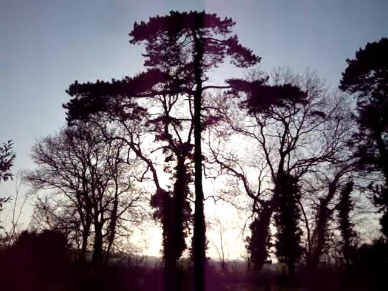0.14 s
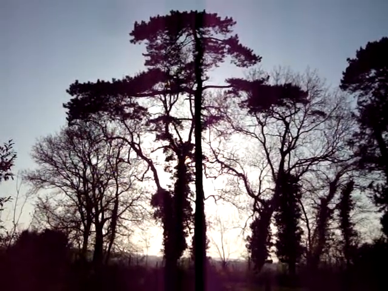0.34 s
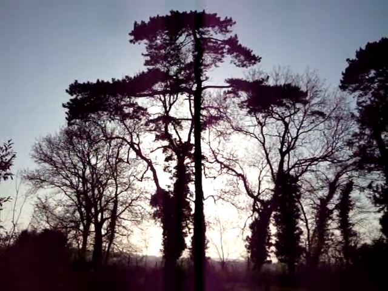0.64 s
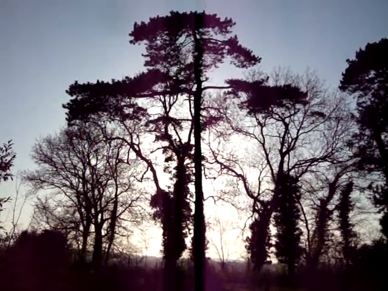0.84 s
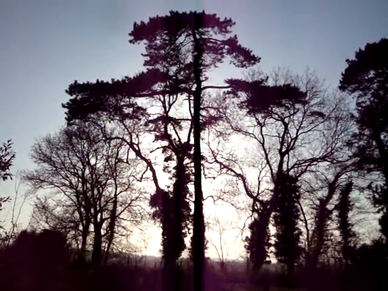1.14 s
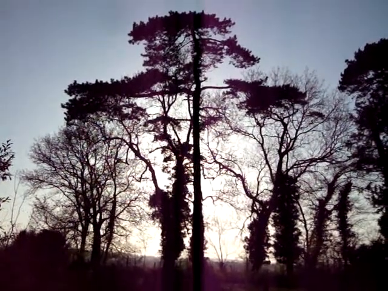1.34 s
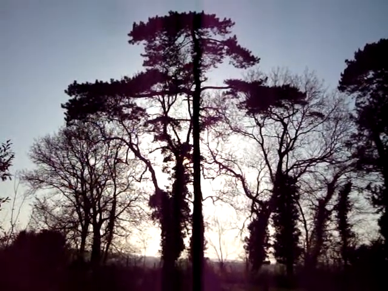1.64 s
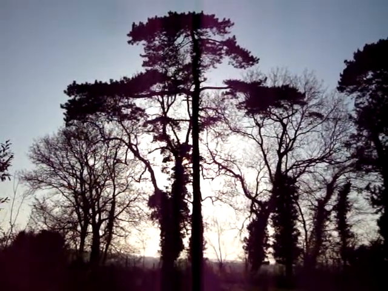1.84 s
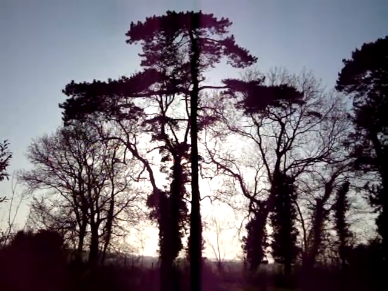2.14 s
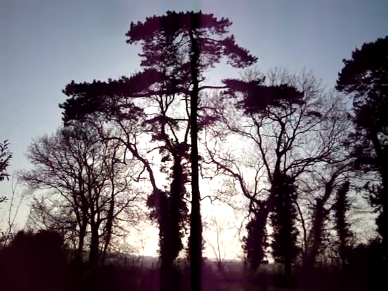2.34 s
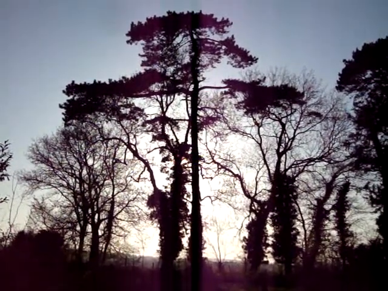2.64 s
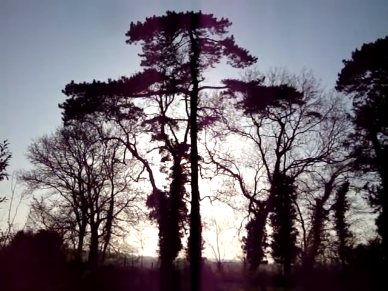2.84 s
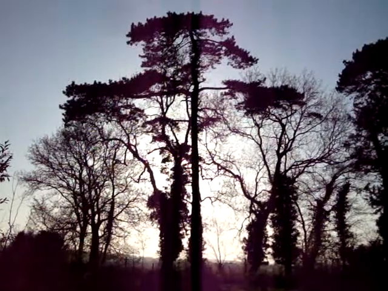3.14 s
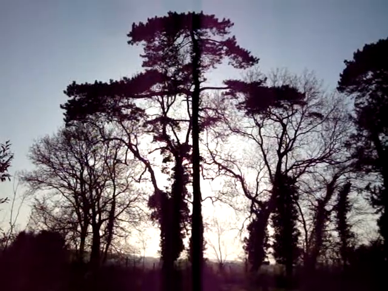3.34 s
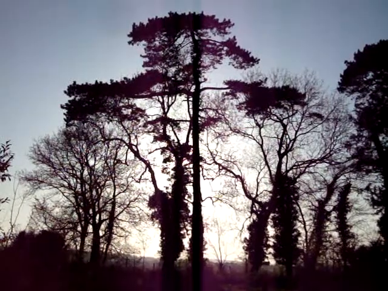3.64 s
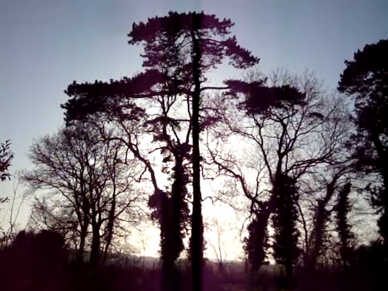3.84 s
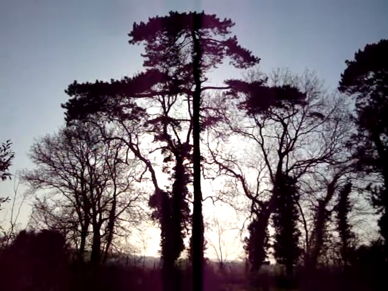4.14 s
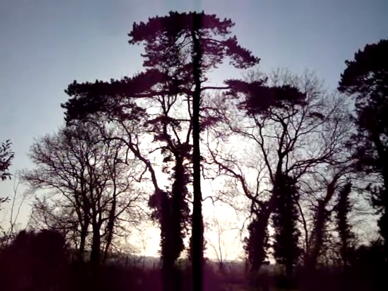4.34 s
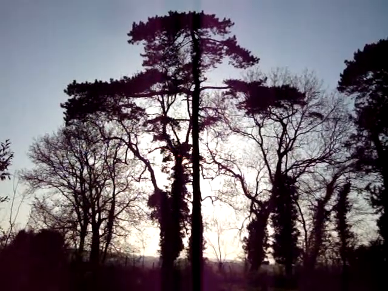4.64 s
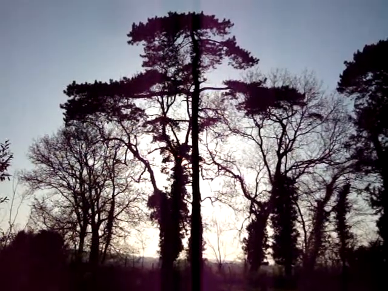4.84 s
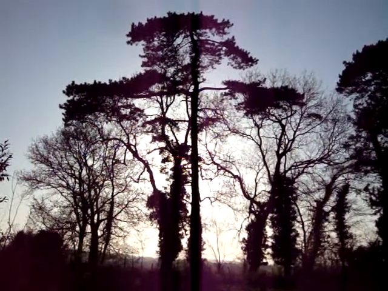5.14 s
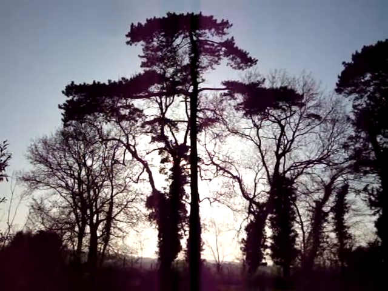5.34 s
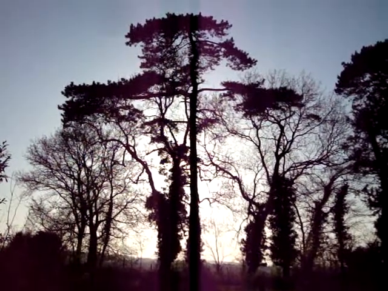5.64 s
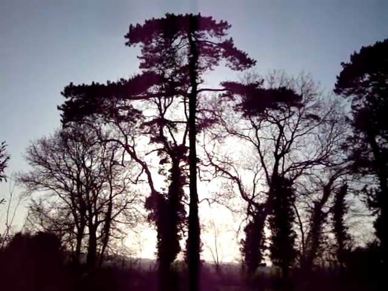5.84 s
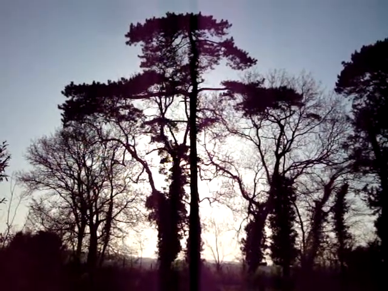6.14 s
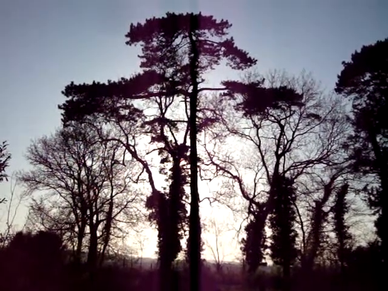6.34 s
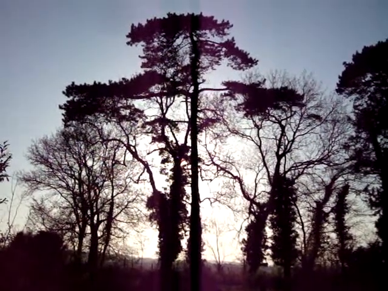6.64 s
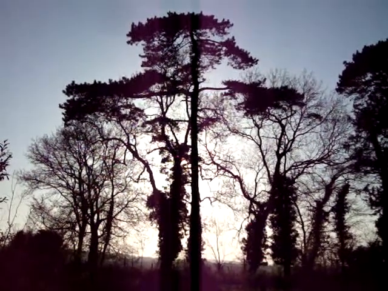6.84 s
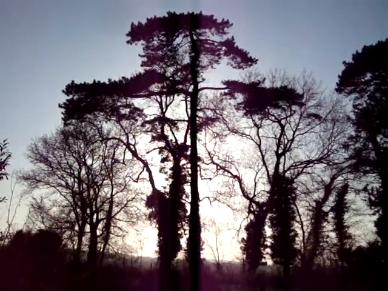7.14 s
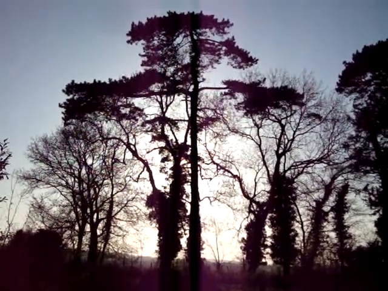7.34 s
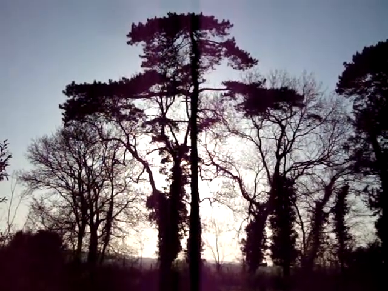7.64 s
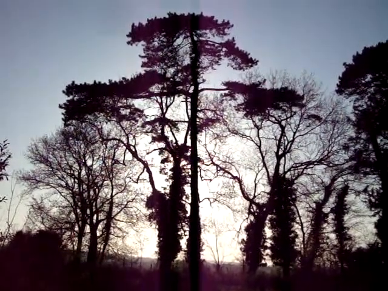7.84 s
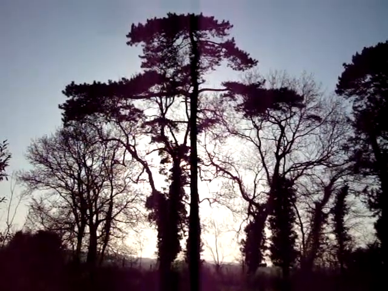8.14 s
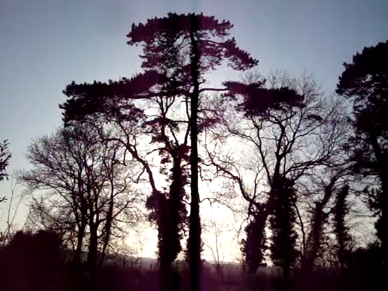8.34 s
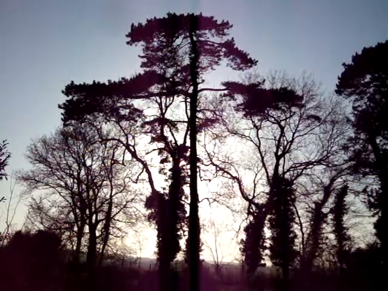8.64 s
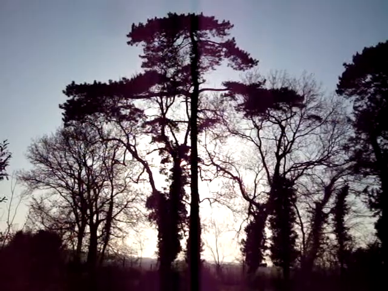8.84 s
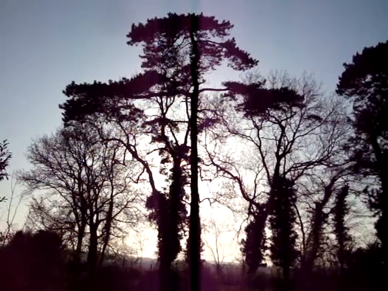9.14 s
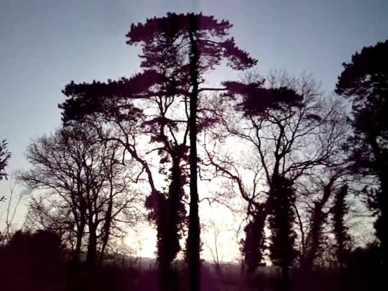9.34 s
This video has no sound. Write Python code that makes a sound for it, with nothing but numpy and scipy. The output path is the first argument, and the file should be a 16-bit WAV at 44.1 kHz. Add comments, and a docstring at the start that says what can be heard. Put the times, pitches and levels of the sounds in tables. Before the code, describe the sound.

Over a steady wash of far traffic and the hiss of a small microphone, a group of crows caws in a stand of trees. The chorus soon thins to occasional caws, leaving the clipped chacks and clear notes of jackdaws and faint pipes of small birds, all slightly echoing. A brief high scolding and a faint tick pass, then one sharp knock hits the microphone's housing before the last few calls.

```python
"""Crows roost in tall trees at dusk. From the start, far traffic roars and a small microphone hisses.
For three seconds hoarse caws overlap, each a buzz shaped by throat and beak; later they come singly.
Jackdaws soon add falling chacks, then clear cries among small birds' pipes; trees scatter every call.
Near 4 s a small bird scolds, at 5.4 s comes a dry tick, and at 7.8 s something knocks on the
microphone's housing. One faint caw and a few last chacks and clear notes end the scene."""
import sys
import numpy as np
from scipy import signal
from scipy.fft import rfft, irfft
from scipy.io import wavfile

SR = 44100
rng = np.random.default_rng(int(sys.argv[2]) if len(sys.argv) > 2 else 0)


def to_wav(s):
    """Save 16-bit WAV."""
    ch = np.atleast_2d(s).T  # columns
    pcm = np.round(np.clip(ch, -1, 1) * 32767)  # PCM
    wavfile.write(sys.argv[1], SR, pcm.astype(np.int16))


N = 418068
CUTOFF_HZ = 10150   # treble above this is cut away

# One caw a row: start/s, length/s, start pitch/Hz, end pitch/Hz, bend (higher = later), level/dB,
# swell from start to end/dB, roughness (0-1), throat tone/Hz, throat width/Hz, beak tone/Hz,
# beak level/dB, shrill tone/Hz, shrill level/dB, fade-in/s, trill depth (share of the pitch)
CROW_CALLS = [(-.16,.41,872,721.6,1.1,-45.5,-2.5,0.37,1690,500,2460,-17,5350,-21,0.011,0.072),
              (-.05,.17,480,412,1.16,-49.5,-11,0.46,950,250,2600,-7,5300,-28,0.012,0.0062),
              (.215,0.13,701,682,1.54,-44,2,0.54,1410,400,2570,-18,5300,-25,0.036,0.043),
              (.27,0.41,291,298.3,2.83,-49,-5.5,0.66,1600,399,2700,-2.5,5300,-18.5,0.082,0.0035),
              (.517,0.15,305.7,337.6,2.57,-45,-1,0.82,1360,344,2440,-13,5200,-25,.015,0.0041),
              (.64,0.38,323.5,285,4,-44,-4,0.27,1390,334,3070,-16.5,5400,-27,0.11,0),
              (.775,0.29,537,388,5.5,-49.5,-2,0.2,1050,340,3240,-25,5270,-32,.05,0.0049),
              (.90,0.33,322.8,261.2,1.23,-48.5,-5,0.58,1580,302,2430,-25,5300,-19.5,0.024,0.0071),
              (1.225,0.23,361.2,330,1.46,-45,-11,0.32,1110,806,2620,-13.5,5930,-21.5,0.035,0.032),
              (1.33,0.30,361.6,335.8,2.2,-47.5,2,0.59,1570,500,2820,-7.5,6000,-25,0.13,0),
              (1.605,0.22,325.2,305,2.46,-47,1,.42,1580,380,2630,-13.5,5340,-23,0.02,0),
              (1.795,.15,332.3,287,1.93,-46.5,-3,.4,1620,397,2820,-16.5,5340,-21,.03,0),
              (1.921,0.26,311,224,2.1,-54,4,0.54,1500,340,2670,-17,5240,-20.5,0.021,0.0063),
              (2.15,0.32,353.6,328.5,2.27,-49,-0.5,0.69,1330,795,2710,-8,5300,-27,0.032,0.021),
              (2.31,0.16,336,323.4,1.94,-46.5,-16,.6,1390,300,2520,-12,5360,-28,.04,.03),
              (2.369,0.15,544,506,1.6,-51,1,0.44,1590,300,2600,-14,5300,-19,.04,0.017),
              (2.488,0.14,308,323,1.5,-49,-9,0.44,1250,250,2550,-13,5300,-30,.02,0.019),
              (2.701,0.37,326,287.6,0.72,-52,-6,0.92,1400,404,2640,-22.5,5330,-34,0.022,0.0062),
              (4.791,0.16,366.4,369,2.1,-59.5,1,0.5,1730,344,2660,-11,5300,-23,.02,0.0032),
              (5.472,0.41,348.6,322.5,1.94,-54,-1,0.75,1460,340,2600,-35,5300,-31,.03,0),
              (6.666,0.36,345.4,315,2.4,-55.5,-6,0.87,1250,344,2600,-30,5300,-34,0.023,0.011),
              (8.421,0.34,357,346,2.8,-65.5,0,0.44,1720,340,2600,-31,5300,-27,.03,0)]
def caws():
    """A crow's voice box buzzes; chest, throat and beak boost some overtones; hoarseness shakes them."""
    out = np.zeros(N)
    k = np.arange(1, 22)[:, None]   # the partials: tones at 1, 2, 3... times the pitch
    scoop_s, fade_out_s, trill_hz, arch_db = 0.025, 0.015, 66.1, 1.5
    for (start, length, start_hz, end_hz, bend, db, swell_db, rough, throat_hz, throat_width_hz,
         beak_hz, beak_db, shrill_hz, shrill_db, fade_in_s, trill) in CROW_CALLS:
        n = int(length * SR)
        u = np.arange(n) / n   # runs from 0 to 1 over the call
        t = u * length
        scoop = 1 - 0.09 * np.exp(-t / scoop_s)   # each caw slides up into its note
        tune = glide(u, start_hz, end_hz, bend) * scoop
        pitch = tune * (1 + .01 * wobble(n, 12))   # the voice wavers
        pitch *= 1 + trill * np.sin(2 * np.pi * trill_hz * t)   # some throats rattle evenly
        shake = (.004 + .024 * rough ** 2) * wobble(n, 60)
        phase = 2 * np.pi * np.cumsum(pitch * (1 + shake)) / SR
        hz = k * pitch
        chest = from_db(-15) * resonance(hz, centre_hz=960, width_hz=250)
        throat = resonance(hz, throat_hz * (tune / start_hz) ** 0.6, throat_width_hz)   # follows the tune
        beak = from_db(beak_db) * resonance(hz, beak_hz, width_hz=560)
        shrill = from_db(shrill_db) * resonance(hz, shrill_hz, width_hz=1200)
        gain = chest + throat + beak + shrill
        gain *= (hz < CUTOFF_HZ) / (1 + (800 / hz) ** 6)   # a small body gives off little bass
        gain /= np.sqrt(np.sum(gain ** 2, axis=0) / 2)   # keep the total power steady
        noisy = np.clip((rough * hz / 1400) ** 2, 0, 1)   # high partials break up first
        gain *= np.sqrt(1 - noisy) + np.sqrt(noisy) * wobble(n, 160, count=len(k))
        voice = np.sum(gain * np.cos(k * phase + .3 * k ** 2), axis=0)
        voice *= 1 + .6 * rough * np.cos(phase / 2)   # strong and weak pulses take turns
        fades = np.clip(np.minimum(t / fade_in_s, (length - t) / fade_out_s), 0, 1)
        effort = from_db(db + swell_db * (u - .5) + arch_db * (np.sin(np.pi * u) - 1.5))
        add(out, start, voice * fades * effort)
    return out


# One chack a row: start/s, length/s, start pitch/Hz, end pitch/Hz, drop point (share of the length),
# level/dB, lowest partial's boost/dB, shrill tone/Hz, shrill boost/dB
JACKDAW_CALLS = [(0.358,0.042,1435,1160,0.46,-50.5,4,4800,-16),
                 (0.733,0.067,1442,930,0.51,-44,-2.5,4700,-10), (.945,0.054,1650,1000,.5,-61,-14,3500,-8),
                 (0.995,0.055,1313,1130,0.43,-55,10,4800,-18), (2.253,0.076,1258,1070,0.25,-54,2,4800,-8),
                 (2.654,0.055,1300,980,0.32,-51,1.5,4800,-18),
                 (2.954,0.048,1413,1300,0.55,-58,-10,4900,-16),
                 (3.392,0.041,1267,1030,0.44,-58,-13,4800,-12), (4.065,0.057,1283,970,0.51,-59,-8,4800,-9),
                 (4.979,0.072,1333,1170,0.34,-60,5.5,4800,-19),
                 (5.345,0.047,1335,1160,0.59,-58.5,-6,4800,-6),
                 (5.402,0.055,1360,720,0.45,-52.5,8.5,4500,-6.5),
                 (5.763,0.077,1435,830,0.32,-51.5,-5,5000,-19), (5.861,0.064,1337,1010,0.39,-53,4,4800,-28),
                 (6.17,0.08,1304,780,0.4,-54,-11,4760,-11), (6.182,0.044,1435,1280,0.48,-54.5,7.5,4800,-16),
                 (6.611,0.056,1420,880,0.55,-46.5,-3,4640,-10), (7.032,.068,1292,690,.4,-52,4,4640,-12),
                 (7.118,0.063,1238,700,0.5,-54,9,4770,-21), (7.198,0.044,1250,810,0.47,-57,1,4800,-19),
                 (7.391,0.061,1444,990,0.52,-46.5,0.5,4800,-18),
                 (7.52,0.063,1326,700,0.74,-54.5,4,4650,-3.5), (7.637,0.072,1333,960,0.46,-51,5,4800,-36),
                 (8.554,0.029,1383,1160,0.36,-51,-3,4800,-24), (9.144,0.061,1406,990,0.53,-46,-1,4800,-23)]
def chacks():
    """A jackdaw's pitch drops sharply, sliding its partials down through throat and beak resonances."""
    out, k = np.zeros(N), np.arange(1, 9)[:, None]
    fade_in_s, swell_db, arch_db, db_per_partial = .004, -4, 5, -8
    for start, length, start_hz, end_hz, drop_at, db, low_db, shrill_hz, shrill_db in JACKDAW_CALLS:
        u = np.arange(int(length * SR)) / (length * SR)
        drop = 1 / (1 + np.exp((drop_at - u) / .08))   # a smooth step from 0 to 1
        pitch = start_hz + (end_hz - start_hz) * (.4 * u + .6 * drop)
        beak = from_db(db_per_partial * (k - 2)) * resonance(k * pitch, centre_hz=2400, width_hz=1250)
        shrill = from_db(shrill_db) * resonance(k * pitch, shrill_hz, width_hz=2600) ** 2
        gain = beak + shrill
        gain[0] = from_db(low_db) * resonance(pitch, centre_hz=1270, width_hz=400)   # the throat
        fades = np.clip(np.minimum(u, (1 - u) / 2) * length / fade_in_s, 0, 1)
        effort = from_db(db + swell_db * (u - .5) + arch_db * (np.sin(np.pi * u) - 1.5))
        add(out, start, fades * effort * partials(pitch, gain, quaver=.015, flutter_db=3.))
    return out


# One clear note a row: start/s, length/s, start pitch/Hz, end pitch/Hz, bend (higher = later),
# level/dB, octave level compared with the note/dB
CLEAR_NOTES = [(1.189,0.077,1220,1280,0.83,-49,-23), (1.194,0.057,3160,3260,0.5,-64,-8),
               (1.595,0.063,1264,1346,0.55,-49.5,-17), (2.475,0.026,1490,1353,1,-52,-20),
               (3.671,0.054,3000,3250,0.85,-63,-23.5), (3.692,0.11,1290,1244,0.76,-53,-21),
               (3.785,0.09,1157,1084,1.06,-51.5,-26), (3.80,0.067,1650,1650,.8,-65,-8),
               (4.224,0.038,3040,3140,.8,-60.5,-19), (4.318,.032,3070,3160,.8,-63,-19),
               (4.35,0.082,1216,1440,0.39,-59,-20), (4.709,0.07,1120,1353,0.21,-48,-30),
               (4.766,0.062,2180,1890,0.76,-65,-20), (4.922,0.049,3200,3080,1.2,-64.5,-20),
               (5.15,0.071,1803,1776,0.91,-67,-13), (5.201,0.12,1240,1390,5.4,-53,-24),
               (5.457,0.029,1503,1220,0.85,-51,-25), (5.53,0.17,1177,1032,0.69,-57.5,-2.5),
               (6.09,0.15,1043,1004,0.84,-75.5,15.5), (7.165,0.0535,1507,1207,0.69,-51.5,-22),
               (7.418,0.12,1199,1052,0.56,-49,-19), (7.572,0.035,1720,1465,1,-53,-12),
               (7.568,0.035,1113,1050,1,-52,-8), (8.365,0.04,3570,3340,0.83,-67,-11),
               (8.445,0.059,1350,1324,.8,-58.5,-28), (9.10,0.16,1285,990,1.6,-52.5,-30),
               (9.448,0.017,1990,1750,0.73,-52.5,-23)]
def clear_notes():
    """Jackdaws' short cries and the pipes of small birds: each a gliding tone and the octave above it."""
    out, fade_s = np.zeros(N), .01
    for start, length, start_hz, end_hz, bend, db, octave_db in CLEAR_NOTES:
        u = np.arange(int(length * SR)) / (length * SR)
        pitch = glide(u, start_hz, end_hz, bend)
        fades = np.clip(np.minimum(u, 1 - u) * length / fade_s, 0, 1)
        gain = from_db([[db], [db + octave_db]])
        add(out, start, fades * partials(pitch, gain, quaver=.009, flutter_db=2.5))
    return out


# One scolding burst a row: start/s, level/dB
SCOLDS = [(3.82, -64.5), (3.90, -66), (3.995, -64), (4.085, -67), (4.19, -68)]
def churrs():
    """A small bird scolds: its high tone is shaken so fast that it turns harsh."""
    pitch_hz, length_s = 4530, 0.038
    out, n = np.zeros(N), int(length_s * SR)
    for start, db in SCOLDS:
        pitch = pitch_hz * (1 + 0.102 * wobble(n, 560))
        phase = 2 * np.pi * np.cumsum(pitch) / SR
        add(out, start, 2 * from_db(db) * np.hanning(n) * np.sin(phase))
    return out


def tree_echoes(calls):
    """One near trunk answers clearly, and the branches send back many small echoes that die away."""
    echoes_per_s, first_echo_s, die_away_s, trunk_delay_s = 2500, .022, .75, .027
    t = np.arange(int(.7 * SR)) / SR
    arrivals = (rng.random(len(t)) < echoes_per_s / SR) & (t > first_echo_s)
    echoes = arrivals * rng.standard_normal(len(t)) * from_db(-60 * t / die_away_s)
    echoes /= np.sqrt(np.sum(echoes ** 2) + 1e-20)
    echoes[int(trunk_delay_s * SR)] += from_db(-10)
    # thin branches return little bass, and the air takes the treble
    band = signal.butter(2, [1700, 4000], "band", fs=SR, output="sos")
    return signal.sosfilt(band, signal.fftconvolve(calls, echoes)[:N])


# The tap on the microphone: t/s, level/dB
TAPS = [(7.7674, -32)]
# The tones its housing rings with: f/Hz, level/dB, time to fade by 60 dB/s
HOUSING_TONES = [(317, -1.5, 0.082), (820, 1.5, 0.043), (940, -24, 0.15), (2000, 2, 0.019)]
def knock():
    """One tap rings the microphone's housing, which is too small to boom."""
    out, t = np.zeros(N), np.arange(int(.15 * SR)) / SR
    for start, db in TAPS:
        for hz, tone_db, ring_s in HOUSING_TONES:
            dying = from_db(db + tone_db - 6 - 60 * t / ring_s)
            add(out, start, dying * np.sin(2 * np.pi * hz * t))
    bass_cut = signal.butter(2, 200, "high", fs=SR, output="sos")
    return signal.sosfilt(bass_cut, out + 1e-18)


def tick():
    """A dry tick, perhaps a twig: a burst of noise that dies at once."""
    start_s, level_db, decay_s = 5.371, -51, .003
    out, t = np.zeros(N), np.arange(int(.02 * SR)) / SR
    add(out, start_s, from_db(level_db) * rng.standard_normal(len(t)) * np.exp(-t / decay_s))
    return out


# How strong the steady noise is from bass to treble: f/Hz, relative level/dB
NOISE_SHAPE = [(15, -59), (25, -24), (107, -16), (134, -12), (181, -13), (383, -6.5), (445, -5.5), (792, 0),
               (1100, -0.5), (1240, -4), (1560, -13.5), (2330, -15.5), (9940, -22), (12900, -69),
               (21900, -120)]
def traffic_and_hiss():
    """Steady noise: the roar of far traffic, with the microphone's hiss above it."""
    hz = np.maximum(np.fft.rfftfreq(N, 1 / SR), 1)
    shape_hz, shape_db = np.array(NOISE_SHAPE).T
    gain = from_db(np.interp(np.log(hz), np.log(shape_hz), shape_db))
    noise = irfft(rfft(rng.standard_normal(N)) * gain, N)
    return from_db(-52) * unit_power(noise)


def from_db(db):
    """Turn decibels into a number to multiply by."""
    return 10 ** (np.asarray(db) / 20)


def unit_power(x):
    """Scale a signal so that its average power is 1."""
    return x / np.sqrt(np.mean(x ** 2) + 1e-20)


def wobble(n, hz, count=1):
    """Random wavering of typical size 1, mostly slower than hz; count gives the number of rows."""
    smooth = signal.butter(2, hz, fs=SR, output="sos")
    noise = rng.standard_normal((count, n + 500))
    return unit_power(signal.sosfilt(smooth, noise)[:, 500:]).squeeze()


def resonance(hz, centre_hz, width_hz):
    """How much of a tone a hollow space lets through: 1 at its centre, less to either side."""
    return 1 / (1 + (2 * (hz - centre_hz) / width_hz) ** 2)


def glide(u, start_hz, end_hz, bend):
    """Pitch on its way from start to end as u runs from 0 to 1."""
    return start_hz + (end_hz - start_hz) * u ** bend


def partials(pitch, gain, quaver, flutter_db):
    """Pure tones at 1, 2, 3... times a slightly unsteady pitch, each flickering in level."""
    n, k = len(pitch), np.arange(1, len(gain) + 1)[:, None]
    phase = 2 * np.pi * np.cumsum(pitch * (1 + quaver * wobble(n, 160))) / SR
    flicker = from_db(flutter_db * wobble(n, 220, count=len(k)))
    return np.sqrt(2) * np.sum(gain * flicker * np.sin(k * phase), axis=0)


def add(out, start_s, sound):
    """Mix a sound in at its start time."""
    at = int(start_s * SR)
    sound = sound[max(-at, 0):N - at]
    out[max(at, 0):max(at, 0) + len(sound)] += sound


def scene():
    """Birds, their echoes, the knock, the tick and the steady noise, alike in both channels."""
    birds = caws() + churrs() + chacks() + clear_notes()
    mono = birds + from_db(-2) * tree_echoes(birds) + knock() + tick() + traffic_and_hiss()
    return np.array([mono, mono])


def record(dry):
    """Cut the highest treble away steeply."""
    treble_cut = signal.cheby2(26, 33, CUTOFF_HZ, fs=SR, output="sos")
    return signal.sosfilt(treble_cut, dry)


dry = scene()
out = record(dry)
to_wav(out)
```